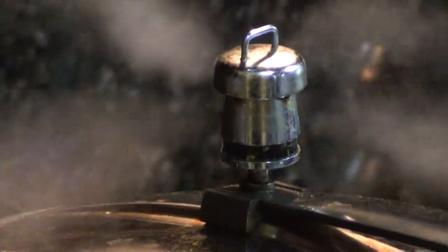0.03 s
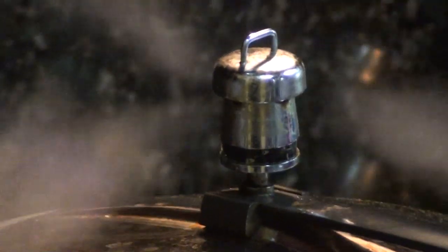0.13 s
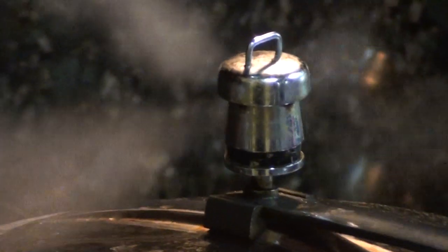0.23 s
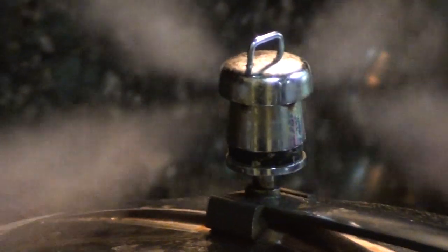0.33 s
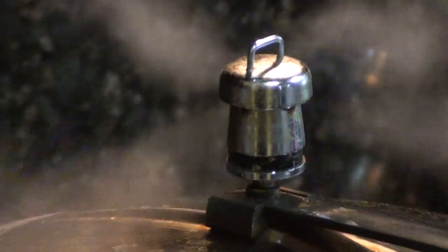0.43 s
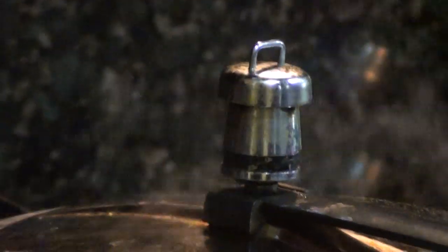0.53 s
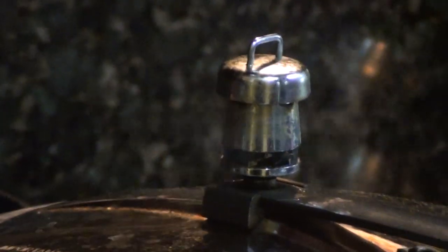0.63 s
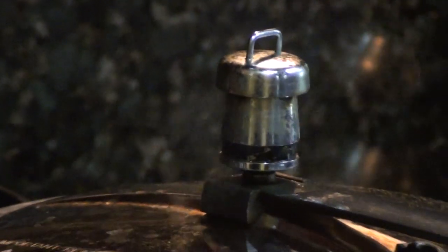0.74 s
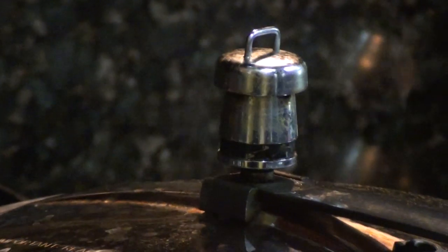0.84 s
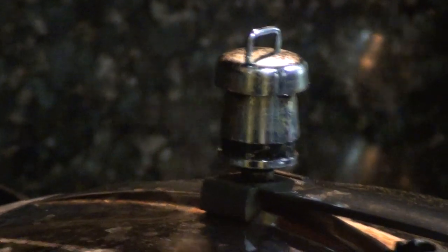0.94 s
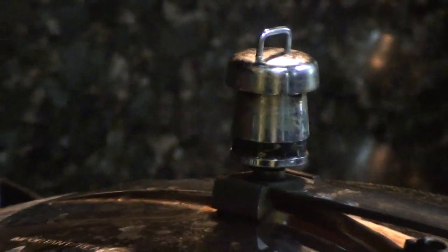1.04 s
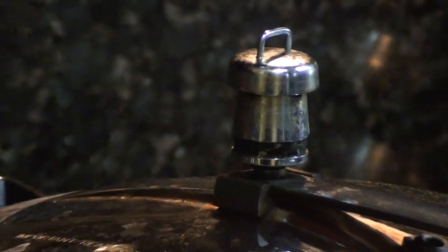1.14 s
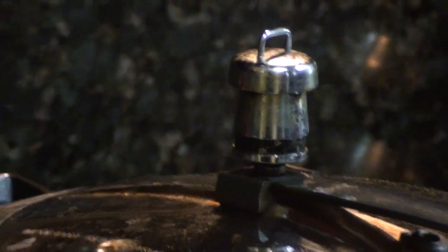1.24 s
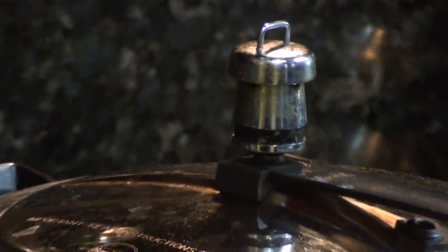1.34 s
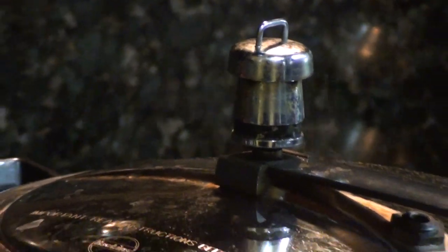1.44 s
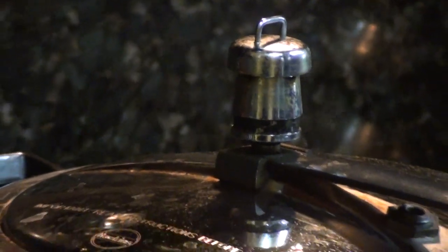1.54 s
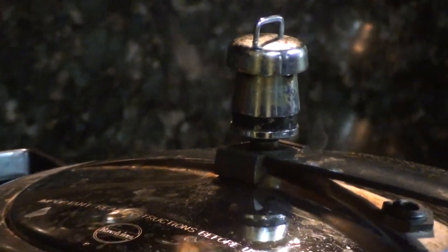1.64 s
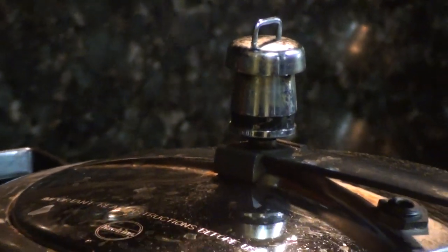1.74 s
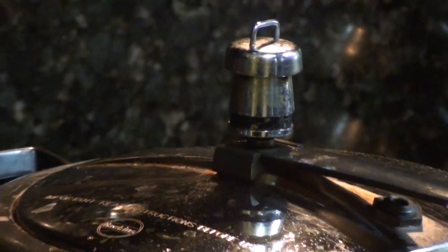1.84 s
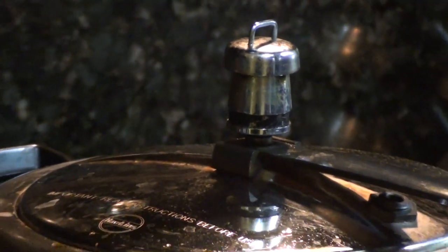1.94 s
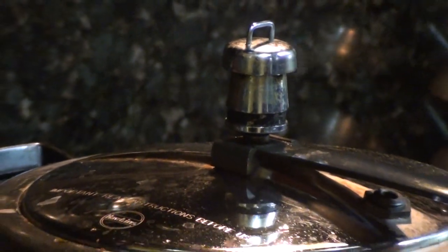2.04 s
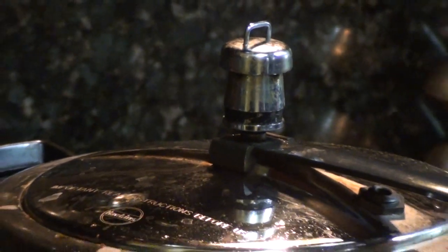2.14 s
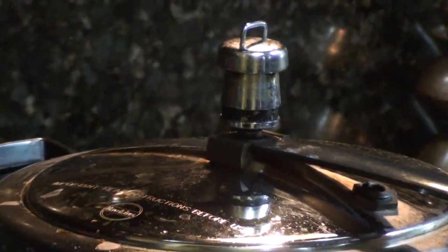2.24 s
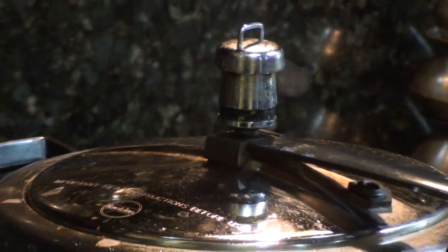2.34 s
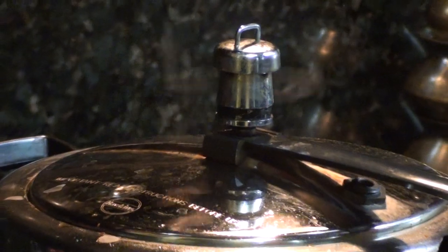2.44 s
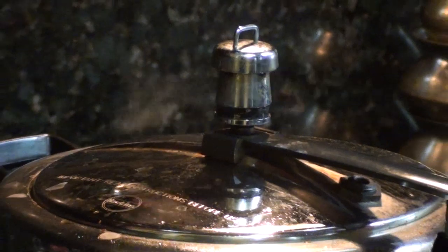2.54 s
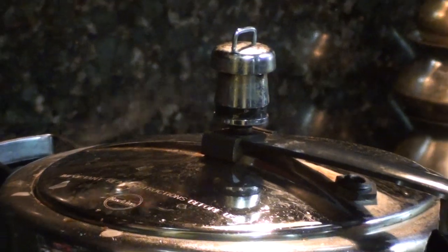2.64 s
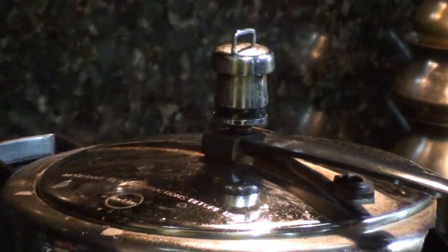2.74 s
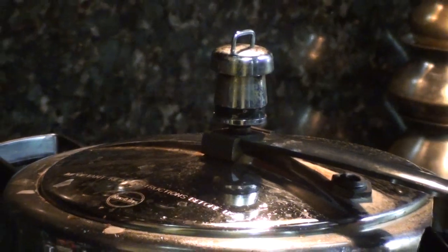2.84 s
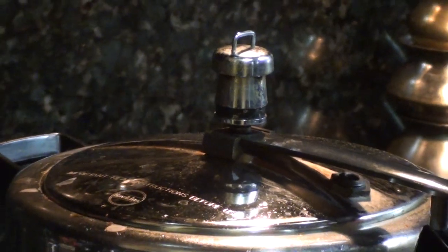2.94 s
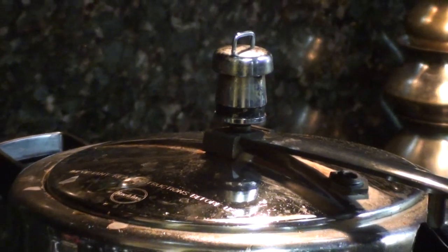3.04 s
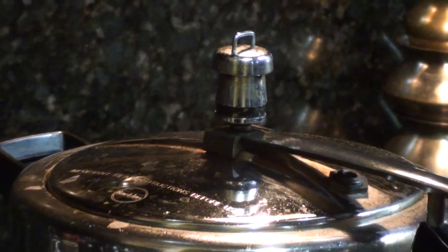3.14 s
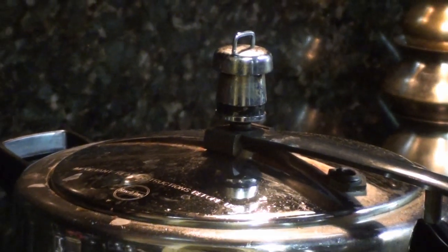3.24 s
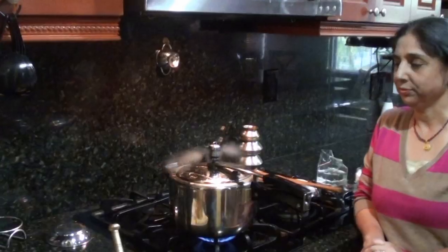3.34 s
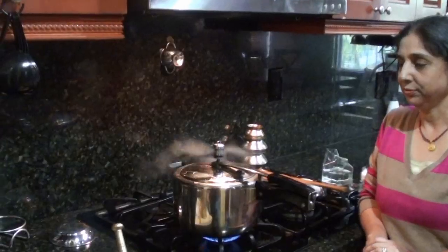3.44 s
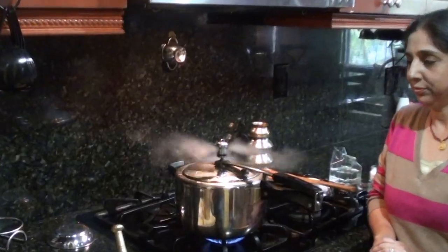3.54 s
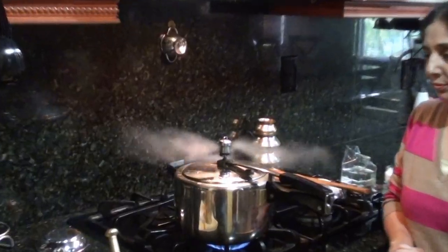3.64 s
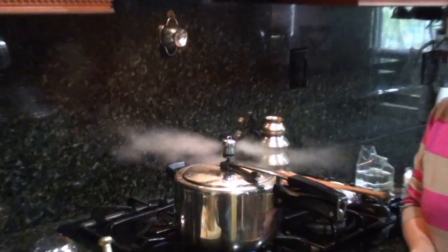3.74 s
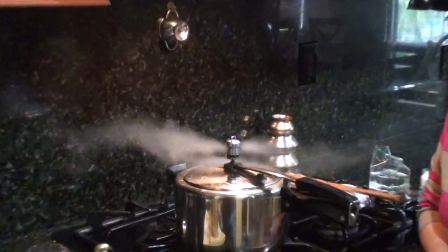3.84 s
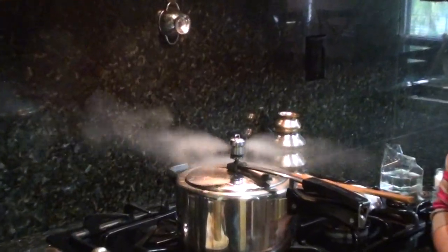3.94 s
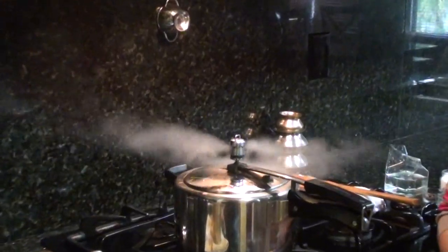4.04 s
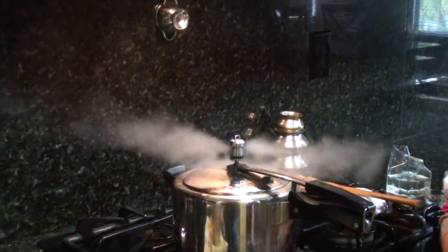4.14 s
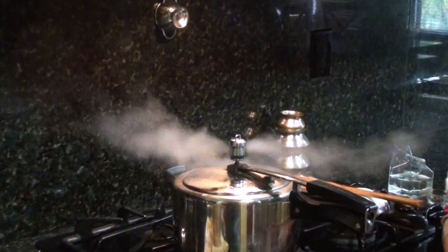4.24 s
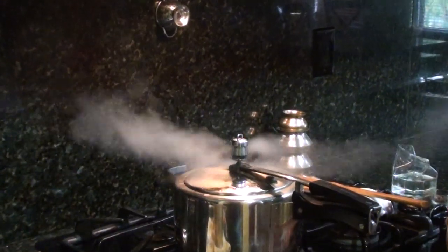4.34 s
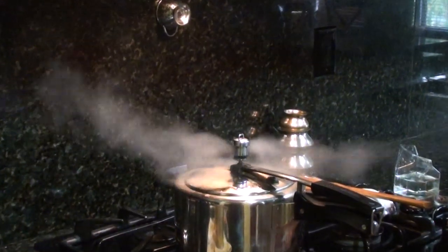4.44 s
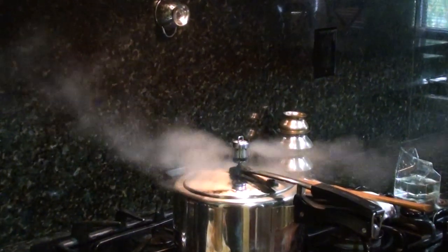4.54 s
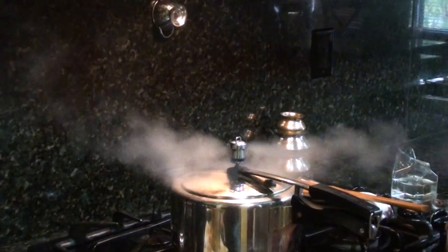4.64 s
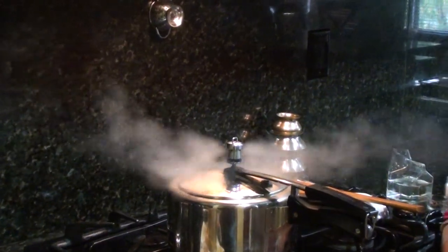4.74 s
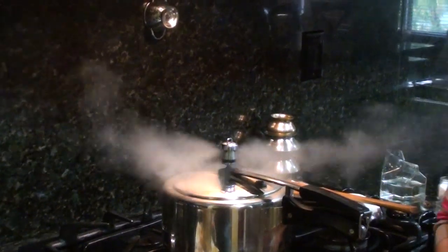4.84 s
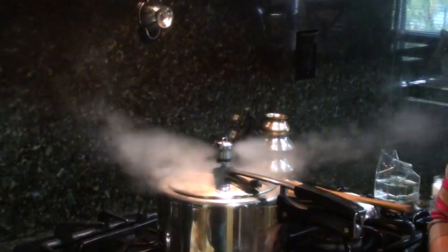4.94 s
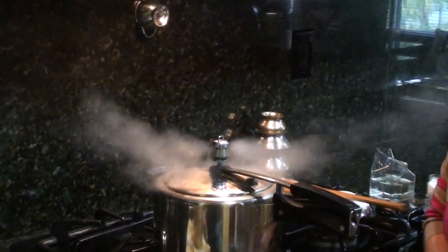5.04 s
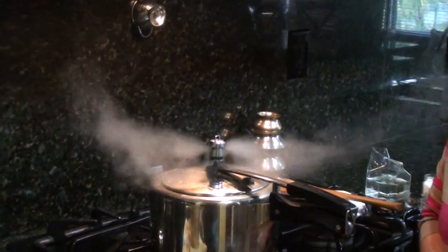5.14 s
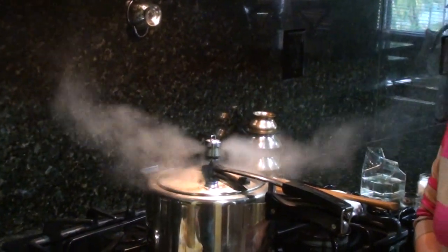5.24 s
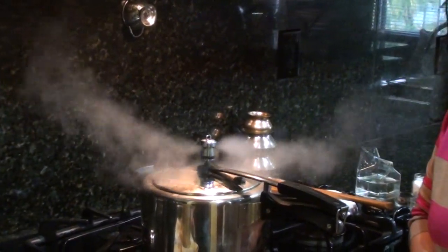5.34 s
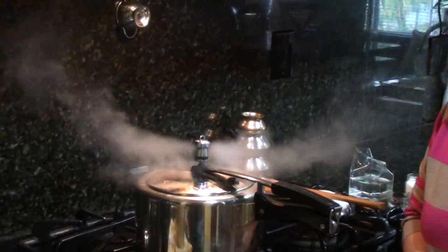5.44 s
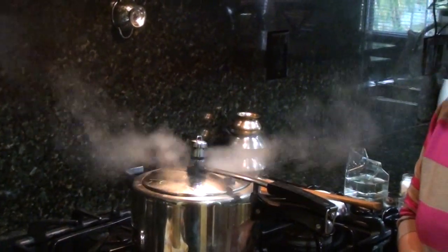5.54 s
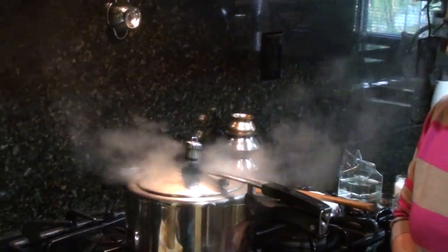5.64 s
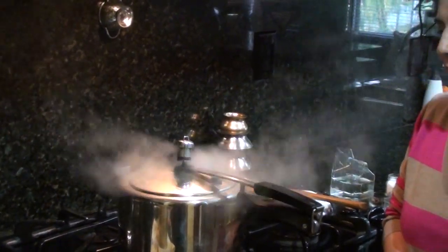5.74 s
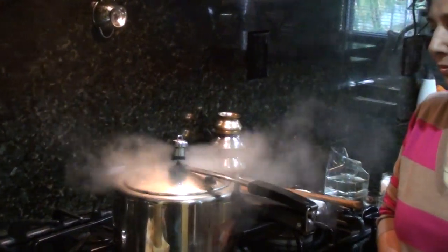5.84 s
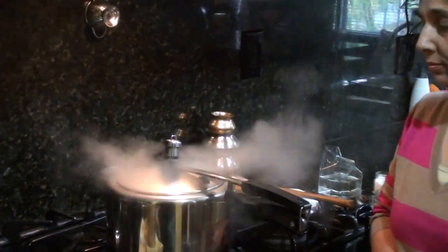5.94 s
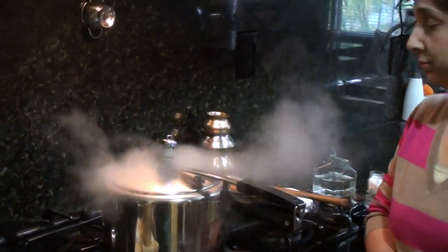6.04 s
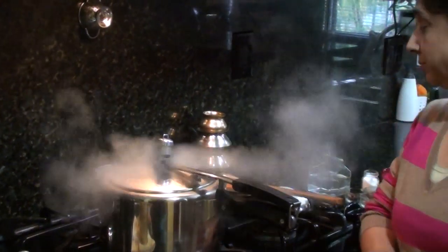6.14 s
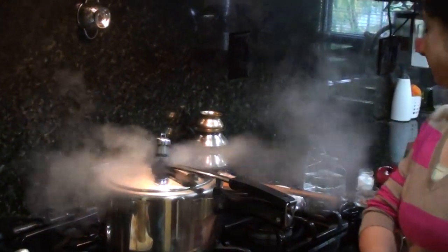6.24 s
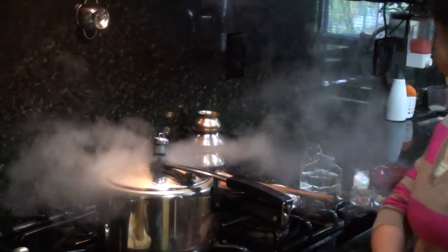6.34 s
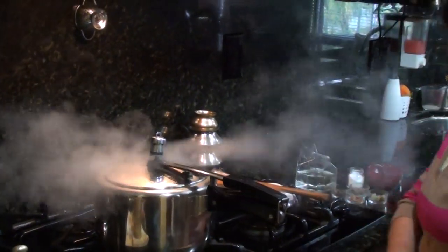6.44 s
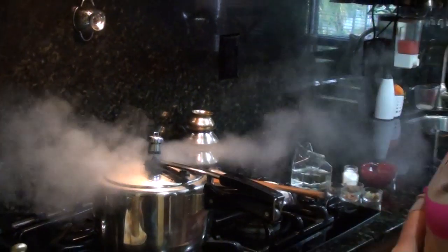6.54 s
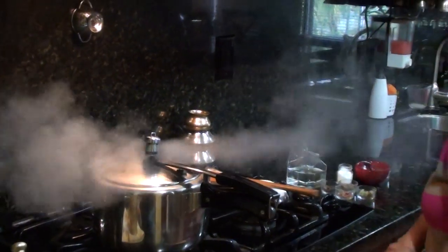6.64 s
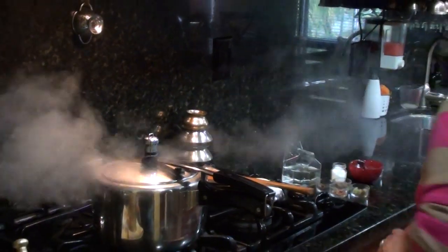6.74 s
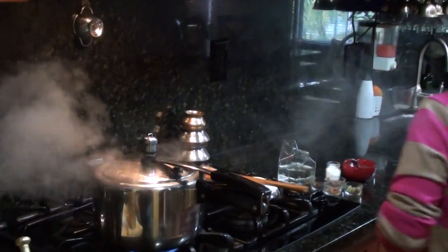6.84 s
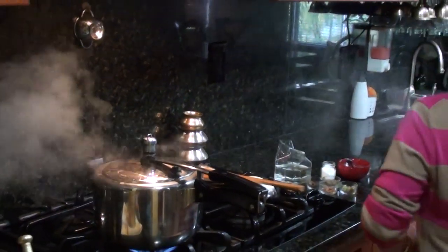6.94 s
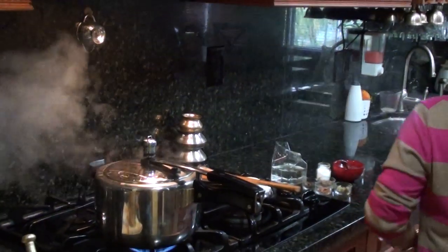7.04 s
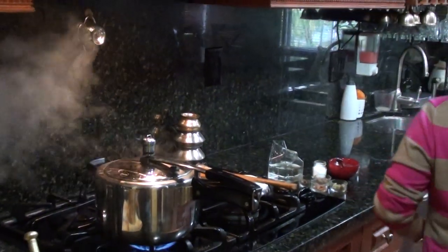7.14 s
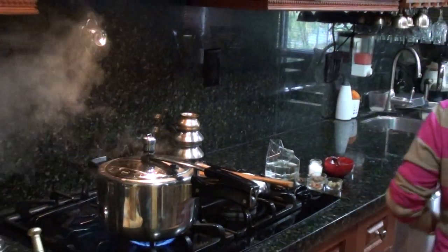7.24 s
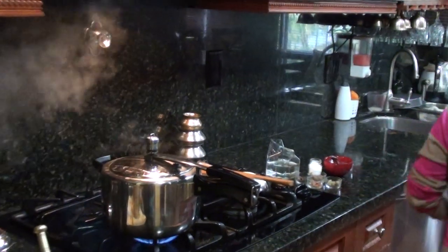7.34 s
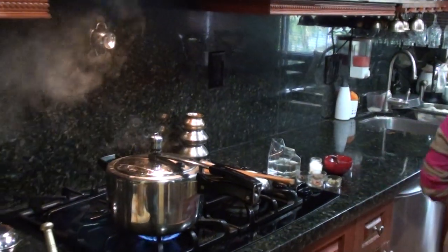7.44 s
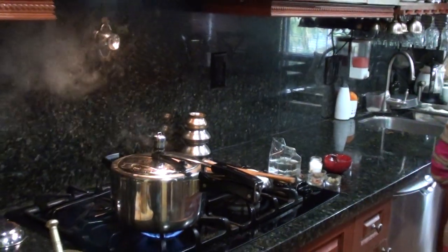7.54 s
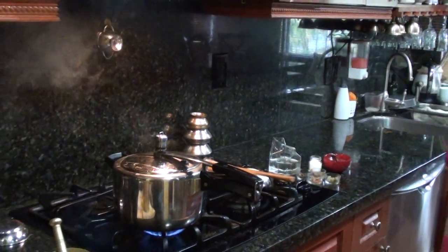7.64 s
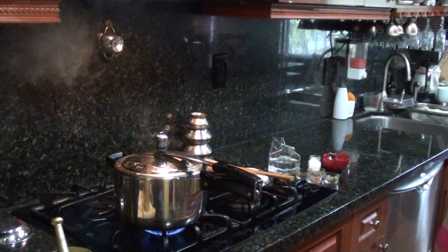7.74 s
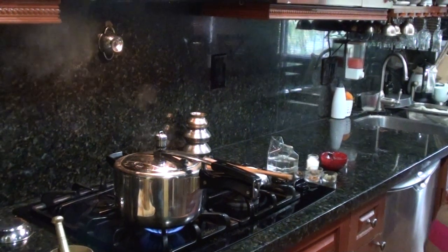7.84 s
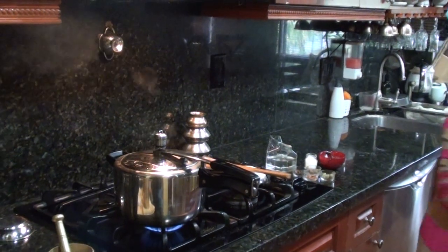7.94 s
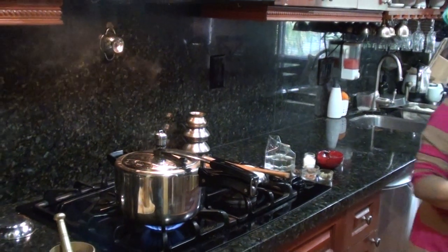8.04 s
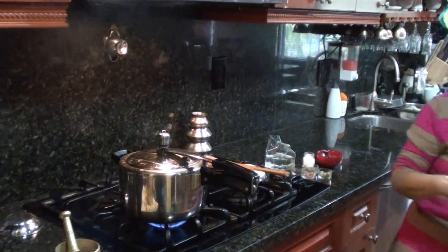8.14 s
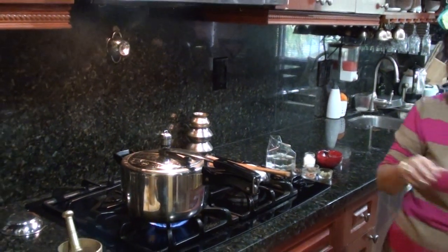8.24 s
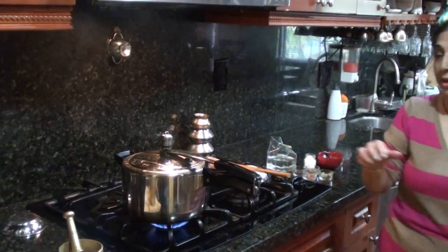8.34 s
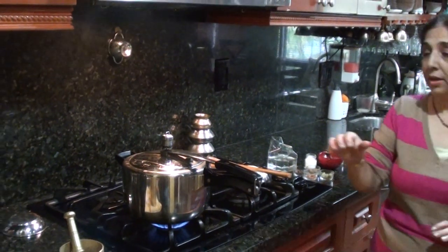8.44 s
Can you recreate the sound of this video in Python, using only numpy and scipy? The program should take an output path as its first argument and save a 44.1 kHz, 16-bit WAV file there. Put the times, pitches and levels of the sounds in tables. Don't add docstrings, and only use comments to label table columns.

```python
import sys
import numpy as np
from scipy import signal
from scipy.fft import rfft, irfft, next_fast_len
from scipy.io import wavfile
from scipy.ndimage import uniform_filter1d

SR = 44100
rng = np.random.default_rng(int(sys.argv[2]) if len(sys.argv) > 2 else 0)


def volts(x):
    e = np.asarray(x, float) / 20
    return 10 ** e


def to_wav(sig):
    pcm = np.clip(np.atleast_2d(sig), -1, 1) * 32767
    pcm = np.round(pcm).astype(np.int16)
    wavfile.write(sys.argv[1], SR, pcm.T)


N = 373968
TIME = np.arange(N) / SR
NEAR, FAR = 0, 1

# start_s, peak_db
DROPS = [
    (0.5762, -21.5),
    (6.7489, -21),
]
# start_s, end_s, leak_db, burner_db, gain_creep_db_per_s
PAUSES = [
    (.8, 3.351, -57.5, -71.5, 3.5),
    (6.9, 8.48, -56.5, -67.5, 3.5),
]
# frequency_hz, side_minus_mid_db
QUIET_SIDE = [(60, -18), (130, -28.5), (290, -10.5), (640, -6), (1410, -6.5), (3100, -12), (6820, -14),
              (15000, -28)]


def evened(x):
    return x / np.sqrt(np.mean(x ** 2) + 1e-20)


def read(points, hz):
    f, value = np.transpose(points)
    return np.interp(np.log(hz + 1), np.log(f + 1), value)


def level(rows):
    s, db = np.transpose(rows)
    inside = (TIME >= s[0]) & (TIME <= s[-1])
    return inside * volts(np.interp(TIME, s, db))


def resonate(x, hz, width):
    turn = np.exp(2j * np.pi * np.cumsum(hz * np.ones(len(x))) / SR)
    r = np.exp(-np.pi * width / SR)
    return 2 * (turn * signal.lfilter([1 - r], [1, -r], x / turn)).real


def placed(s, sound):
    out = np.zeros(N + len(sound))
    out[round(s * SR):][:len(sound)] = sound
    return out[:N]


def turbulence(spectrum, side, cavities=(), patchy_db=1.0, flicker_db=.5, ripple_db=1.0):
    frames, hz = N // 512 + 5, np.fft.rfftfreq(2048, 1 / SR)
    a, b, c, d, patches = rng.standard_normal((frames, 1025, 5)).T
    patches = evened(uniform_filter1d(uniform_filter1d(patches, size=24, axis=0), size=6, axis=1))
    ripple = evened(uniform_filter1d(rng.standard_normal(len(hz)), size=2))
    ripple = ripple * (1 + hz / 3000) ** -.3
    cavity_db = sum(db / (1 + (2 * (hz - f) / width) ** 2) for f, width, db in cavities)
    steady_db = read(spectrum, hz) + cavity_db + ripple_db * ripple
    flicker = flicker_db * rng.standard_normal(frames)
    field = volts(steady_db[:, None] + patchy_db * patches + flicker)
    mid = field * (a + 1j * b)
    across = field * (c + 1j * d) * volts(read(side, hz))[:, None]
    stereo = np.array([mid + across, mid - across])
    return evened(signal.istft(stereo, nperseg=2048, noverlap=1536)[1][:, :N])


def jet(place, roar_db, fizz_db):
    # start_s, shutting_s, strength_db
    jets = [
        (0.0, .548, -14.5),
        (3.34, 6.735, -15.5),
    ]
    # frequency_hz, density_db_per_hz
    near_colour = [(60, -60), (400, -45), (717, -23.5), (1100, -28), (1860, -17), (2700, -11),
                   (3600, -15.5), (4300, -9), (8000, 1), (9900, -3.5), (10700, -10), (12300, -11),
                   (13500, -17), (15700, -23)]
    far_colour = [(60, -52.5), (450, -41.5), (750, -25.5), (1520, -23), (1900, -17.5), (2950, -12),
                  (3750, -17), (4100, -10.5), (5550, -4.5), (8500, 1), (11500, -7), (13300, -17),
                  (14500, -21), (15700, -20.5)]
    # frequency_hz, width_hz, level_db
    near_cavities = [(720, 60, -3), (1870, 80, 3), (2500, 80, -1.5), (3200, 120, 3.5), (7900, 370, -5),
                     (9700, 160, 1)]
    far_cavities = [(708, 43, 2.5), (990, 10, -7), (1649, 43, 7.5), (1868, 80, 7), (2120, 95, 4.5),
                    (2430, 17, -5), (2834, 45, 5.5), (4070, 150, 0.5), (4380, 39, -2), (6560, 20, -1),
                    (6550, 18, 0.5), (7218, 48, 4.5), (8060, 70, 2), (7700, 120, 2.5), (9000, 60, 1)]
    # frequency_hz, side_minus_mid_db
    jet_side = [(60, -14), (240, -26), (480, -26), (950, -20), (1900, -18.5), (3400, -15), (6000, -13.5),
                (8000, -15.5), (11000, -23.5), (12500, -20), (15000, -23)]
    # time_s, pinch_db
    pinches = [
        [(0.0, 1.1), (.5, 1.3), (.57, 0.5)],
        [(3.36, 0), (3.5, 0.1), (4.3, 0.4), (4.7, -.4), (5.46, -0.6), (5.6, 2.3), (6.15, 2), (6.6, 1.5),
         (6.74, 2)],
    ]
    layer_edges_hz = [3700, 7000, 10500, 13200]
    layers = [
        (-.5, 8, 13),
        (-0.64, 1.5, -7),
        (-0.35, 1.1, 17),
        (0.8, -5, 91),
        (-0.1, 0, 115),
    ]
    shut_s, fall_db_per_s = 0.013, 162

    colour, cavities = [(near_colour, near_cavities), (far_colour, far_cavities)][place]
    steam = turbulence(colour, jet_side, cavities, patchy_db=0.59, flicker_db=0.5, ripple_db=2.5)
    size = next_fast_len(N, True)
    hz = np.fft.rfftfreq(size, 1 / SR)
    below = [0] + [1 / (1 + (hz / edge) ** 8) for edge in layer_edges_hz] + [1]
    start, shut, db = jets[place]
    dying = shut_s * np.logaddexp(0, (TIME - shut) / shut_s)
    landed = np.clip(TIME - DROPS[place][0], 0, 1)
    pinch_db = np.interp(TIME, *np.transpose(pinches[place]))
    trims_db = [roar_db, 0, 0, fizz_db, fizz_db]
    spectra, out = rfft(steam, size), 0
    for low, high, trim_db, (follow, jump_db, fall_db) in zip(below, below[1:], trims_db, layers):
        landing_db = jump_db * np.minimum(landed / shut_s, 1) - fall_db * landed
        share = volts(trim_db + follow * pinch_db + landing_db)
        out = out + share * irfft(spectra * (high - low), size)[:, :N]
    return (TIME >= start) * volts(db - fall_db_per_s * dying) * out


def burner_gain(place, ducked_db, rumble_db):
    start, _, _, db, creep = PAUSES[place]
    since = np.maximum(TIME - DROPS[place][0], 0)
    rest = volts(db + creep * np.clip(TIME - start, 0, 3))
    rumble = volts(rumble_db - 60 * since / 1.1)
    return np.where(since > 0, np.hypot(rest, rumble), volts(ducked_db))


def burner(far):
    # frequency_hz, density_db_per_hz
    flame_colour = [(15, -50), (25, -12), (48, -22.5), (108, -4), (169, -2), (275, -4), (521, -9),
                    (567, -6.5), (644, -4.5), (763, -10), (1010, -6.5), (1670, -11), (2510, -11.5),
                    (3670, -15), (4000, -14), (5200, -27), (8800, -120)]
    ducked_db = [-69.5, -71]
    near_gain = burner_gain(NEAR, ducked_db[NEAR], rumble_db=-57.5)
    far_gain = burner_gain(FAR, ducked_db[FAR], rumble_db=-55.5)
    flame = turbulence(flame_colour, QUIET_SIDE, patchy_db=1.5, flicker_db=-1.2, ripple_db=1.0)
    return volts(6.5) * np.where(far, far_gain, near_gain) * flame


def decaying_modes(modes, t):
    return sum(volts(db - 60 * t / t60) * np.sin(2 * np.pi * hz * t) for hz, db, t60 in modes)


def clunk(place, walls_db, across_db):
    # frequency_hz, level_db, t60_s
    lids = [
        [(756, 9.5, 0.015), (1460, -14, .008), (630, -35, .05), (700, -18, 0.099), (970, -5, 0.025),
         (1250, -12, .15), (1560, -13, 0.12), (2120, -26, 0.049)],
        [(790, 8.5, 0.013), (1480, -19, .01), (650, -25, .06), (678, -16, .12), (790, -20, .1), (955, 1, 0.043),
         (1345, -7, 0.062), (2100, -23, 0.052)],
    ]
    # frequency_hz, level_db, t60_s
    rings = [
        [(701, -15, .55), (724, -19, .55), (684, -18, .4), (660, -15, .3), (3232, -12, .36), (3260, -15, .32)],
        [(712, -14, .46), (688, -15, .42), (735, -17, .45), (760, -15, .4), (1240, -17, .3), (3250, -25, .25)],
    ]
    # delay_s, level_db
    bounces = [
        (.034, -11),
        (.046, -3.5),
    ]
    s, db = DROPS[place]
    hop_s, hop_db = bounces[place]
    t = np.arange(SR // 2) / SR
    no_bass = signal.butter(4, 520, "high", fs=SR, output="sos")
    ring = signal.sosfilt(no_bass, decaying_modes(lids[place], t))
    ring = ring / abs(ring).max()
    ring = ring + volts(hop_db) * placed(hop_s, ring)[:len(t)]
    boom = decaying_modes([(237.6, -27, 0.28)], t) * np.clip(t / 0.046, 0, 1)
    lasting = decaying_modes(rings[place], t) * np.clip(t / 0.0048, 0, 1)
    walls = rng.standard_normal((2, len(t))) * volts(-60 * t / 0.33) * np.clip(t / 0.0019, 0, 1)
    echo = [signal.fftconvolve(ring + boom, wall / np.linalg.norm(wall))[:len(t)] for wall in walls]
    mid = placed(s, ring + boom + lasting + volts(walls_db) * echo[0])
    across = placed(s, volts(across_db) * echo[1])
    return volts(db) * np.array([mid + across, mid - across])


def leak_gain(pause, rocking):
    start, end, db, _, creep = pause
    crest, rate_hz, depth_db, loss, lean = rocking
    turn = 2 * np.pi * rate_hz * (TIME - crest)
    since = np.clip(TIME - start, 0, end - start)
    swell = np.cos(turn) - lean * np.sin(2 * turn)
    inside = (TIME >= start - .15) & (TIME <= end + .01)
    return inside * volts(db + creep * since + depth_db * np.exp(-loss * since) * swell)


def leak():
    # frequency_hz, density_db_per_hz
    leak_colour = [(1180, -41), (2000, -21), (2480, -9.5), (2890, -15.5), (3670, -12), (3820, -22),
                   (4140, -10.5), (5260, -6.5), (7120, 0), (9810, -6), (13500, -12.5)]
    # first_crest_s, rate_hz, depth_db, depth_loss_per_s, lean of the swell
    rockings = [
        (1.005, 3.88, 2.5, 0.7, .05),
        (7.07, 3.98, 2.2, .05, 0.31),
    ]
    # centre_s, level_db
    spurts = [(6.985, -46.5), (7.208, -56), (7.69, -59), (7.965, -61), (8.212, -51), (8.478, -49),
              (1.79, -63), (2.3, -56)]
    puffs = sum(volts(db) * np.exp(-((TIME - s) / 0.024) ** 2) for s, db in spurts)
    seep = np.hypot(sum(map(leak_gain, PAUSES, rockings)), puffs)
    edge_hz = 14330
    colour = leak_colour + [(edge_hz, -14.5), (edge_hz + 700, -17), (edge_hz + 2500, -25)]
    return seep * turbulence(colour, QUIET_SIDE, patchy_db=-0.5, flicker_db=-0.5, ripple_db=3.0)


def lens_motor():
    # start_s, end_s, multiple of the step rate, level_db
    whines = [(1.2, 1.89, 64, -72), (2.0, 2.74, 64, -70), (1.36, 1.72, 65, -81), (1.82, 2.3, 65, -75),
              (2.38, 2.77, 65, -70.5), (1.86, 2.04, 66, -76), (2.4, 2.72, 63, -78), (7.67, 8.07, 65, -72),
              (7.68, 8.04, 66, -74)]
    step_hz, fade_s = 59.94, .04
    out = 0
    for start, end, multiple, db in whines:
        fade = np.clip(np.minimum(TIME - start, end - TIME) / fade_s, 0, 1)
        tone = np.sin(2 * np.pi * (multiple * step_hz * TIME + rng.random()))
        out = out + np.sqrt(2) * fade * volts(db) * tone
    return out


def knocks():
    # start_s, peak_db, centre_hz, width_hz, t60_s
    events = [(6.936, -55, 2800, 2800, 0.21), (6.965, -52.5, 2200, 3000, 0.21),
              (7.165, -62, 1500, 300, .15), (7.19, -59, 1350, 300, .1), (7.25, -57, 1200, 400, .08),
              (7.373, -45.5, 6400, 3700, .08), (7.389, -48, 4500, 4300, 0.058),
              (7.65, -55, 1850, 500, 0.12), (7.82, -54, 1100, 800, 0.064), (8.192, -56, 1500, 4000, 0.27),
              (8.191, -55, 310, 200, .4), (7.359, -51, 180, 190, .2), (7.221, -58, 210, 150, .3),
              (8.2255, -37.5, 2800, 4500, .015), (8.231, -49, 2900, 3800, 0.22),
              (8.283, -43, 480, 390, .04), (8.287, -46, 600, 550, 0.032), (8.435, -55, 1600, 200, .2),
              (8.456, -50, 1420, 100, .4), (8.45, -56, 2700, 500, .3)]
    t = np.arange(SR // 4) / SR
    dull = signal.butter(8, 12000, fs=SR, output="sos")
    out = 0
    for s, db, hz, width, t60 in events:
        burst = resonate(resonate(rng.standard_normal(len(t)), hz, width), hz, width)
        out = out + placed(s, signal.sosfilt(dull, volts(db - 60 * t / t60) * evened(burst)))
    return out


def drag():
    # time_s, level_db
    pull = [
        (8.276, -70),
        (8.286, -47),
        (8.364, -47.5),
        (8.43, -58),
    ]
    # frequency_hz, width_hz, level_db
    utensil = [(437, 28, -1), (370, 42, -1.5), (680, 110, -3.5), (1260, 78, -6), (1600, 56, -2),
               (1690, 40, -5), (1900, 57, 0), (2000, 40, -2), (3300, 1000, -6), (5360, 1200, -3)]
    under = slice(round(pull[0][0] * SR), round(pull[-1][0] * SR))
    wander = evened(uniform_filter1d(rng.standard_normal(N), size=150))
    turns = 212 * TIME + .08 * wander
    slips = np.diff(np.floor(turns), prepend=0) > 0
    force = (25 * slips + rng.standard_normal(N))[under]
    body = 0
    for hz, width, db in utensil:
        body = body + volts(db) * evened(resonate(resonate(force, hz, width), hz, width))
    return volts(-1.5) * level(pull) * placed(pull[0][0], evened(body))


def scene():
    far = TIME >= 3.351
    near_jet = jet(NEAR, roar_db=-2.0, fizz_db=2.5)
    far_jet = jet(FAR, roar_db=0.25, fizz_db=4.5)
    clunks = clunk(NEAR, walls_db=4.5, across_db=-7) + clunk(FAR, walls_db=2.5, across_db=-9)
    small = lens_motor() + knocks() + drag()
    return ~far * near_jet + far * far_jet + burner(far) + clunks + leak() + small


def mute_faint_top(x):
    # from_hz, to_hz, threshold_db
    gates = [(13660, 14350, -90.9), (14350, 15040, -86), (15040, 16500, -76.5)]
    hz, _, z = signal.stft(x, SR, nperseg=2048)
    keep = np.ones(z.shape[1:])
    for low, high, db in gates:
        band = (hz >= low) & (hz < high)
        keep[band] = np.mean(abs(z[:, band].mean(0)) ** 2, 0) > volts(db) ** 2
    return signal.istft(z * keep, SR, nperseg=2048)[1][:, :N]


def roll_off(x):
    return signal.sosfilt(signal.butter(12, 16370, fs=SR, output="sos"), x)


def record(dry):
    balanced = dry * volts([[.1], [-.1]])
    rounded = 1.3 * np.tanh(balanced / 1.3)
    band_limit = signal.firwin(1501, 15740, window=("kaiser", 9), fs=SR)
    limited = signal.oaconvolve(rounded, band_limit[None], "same")
    return roll_off(mute_faint_top(limited))


dry = scene()
out = record(dry)
to_wav(out)
```